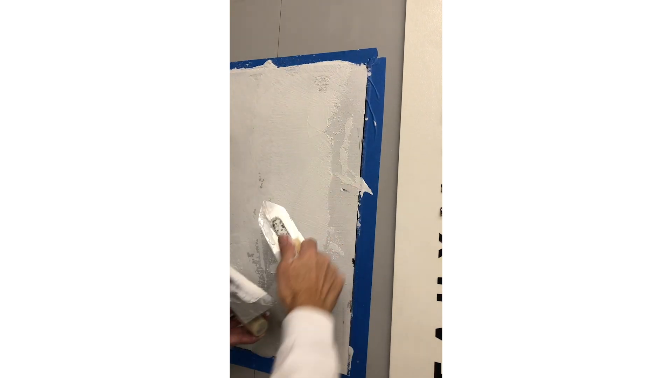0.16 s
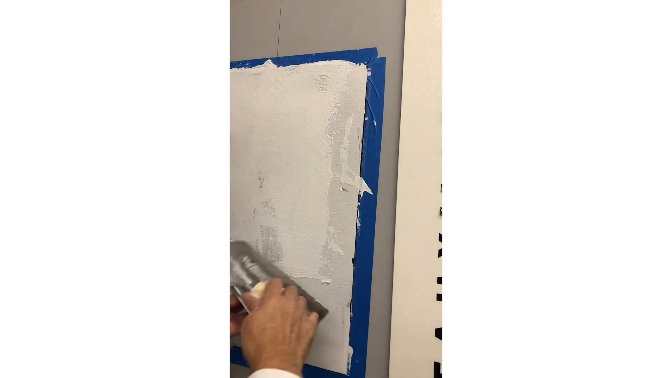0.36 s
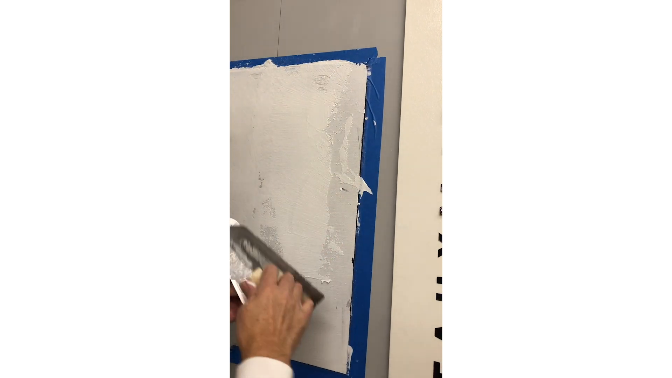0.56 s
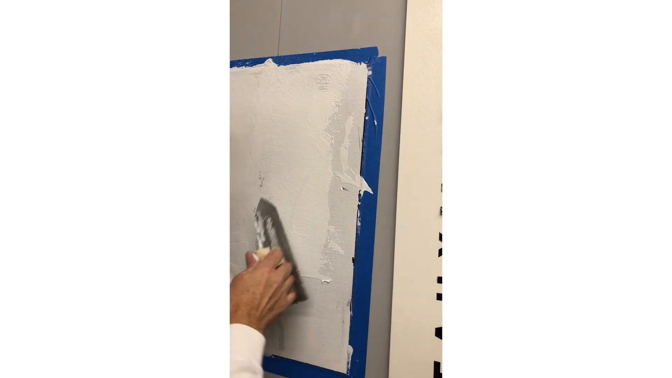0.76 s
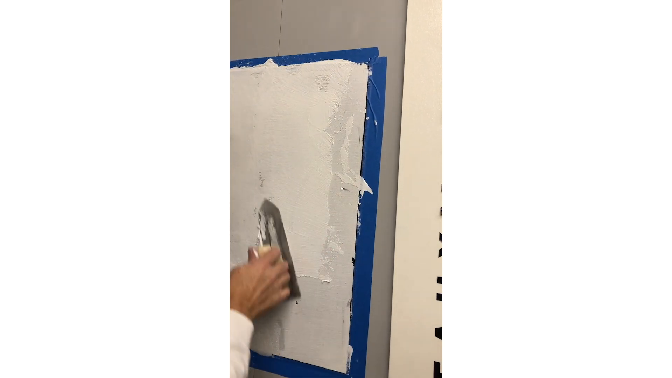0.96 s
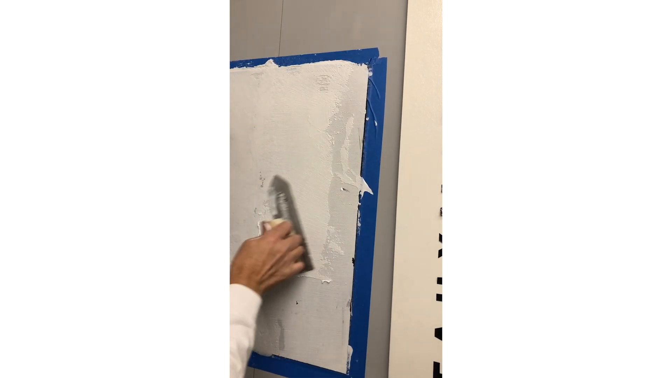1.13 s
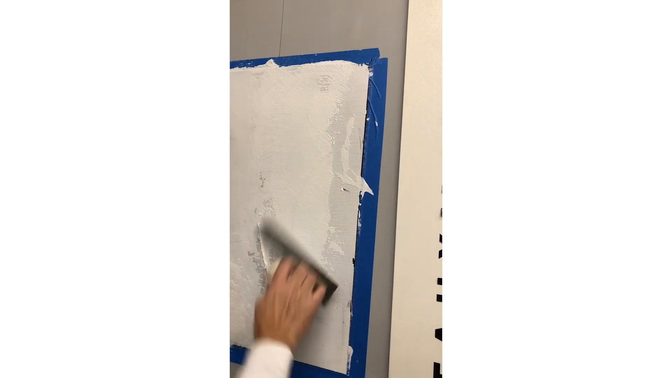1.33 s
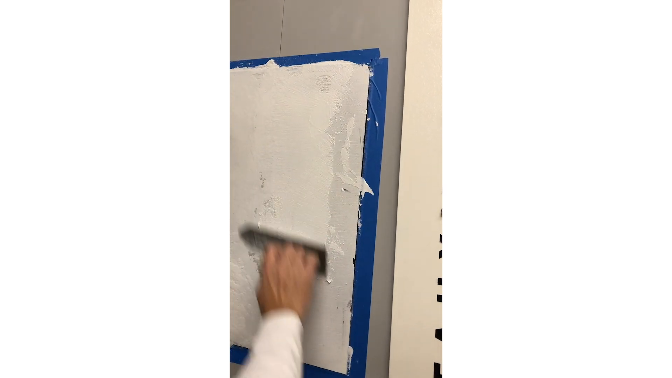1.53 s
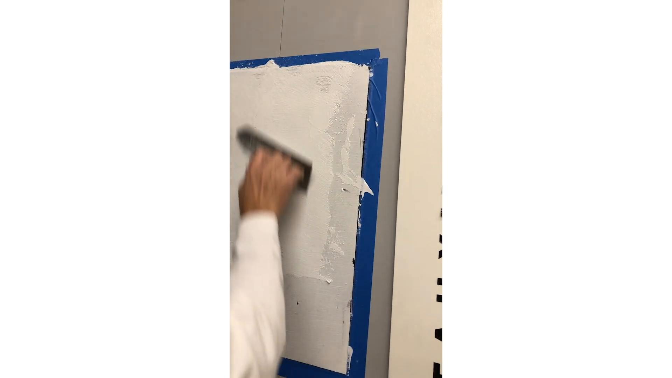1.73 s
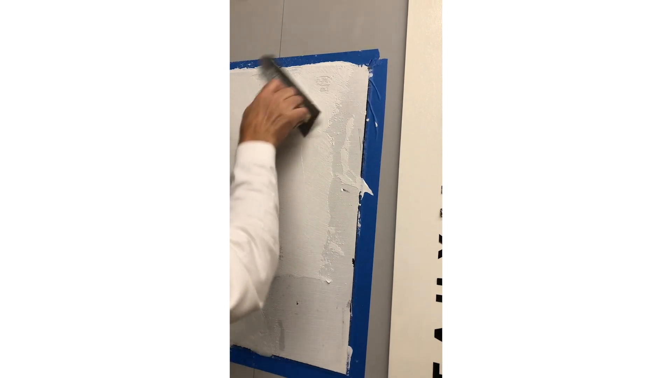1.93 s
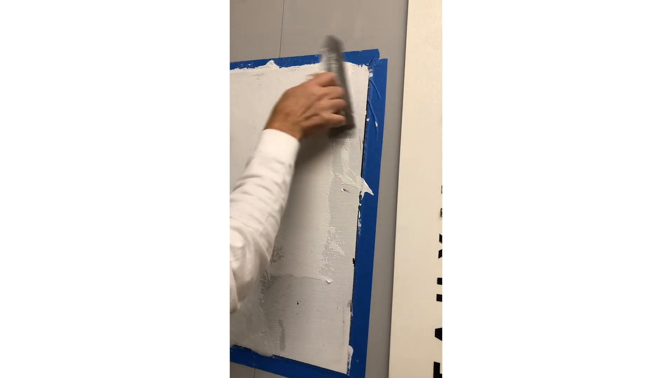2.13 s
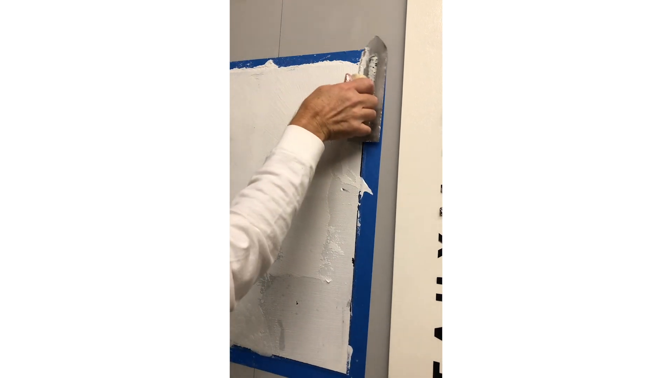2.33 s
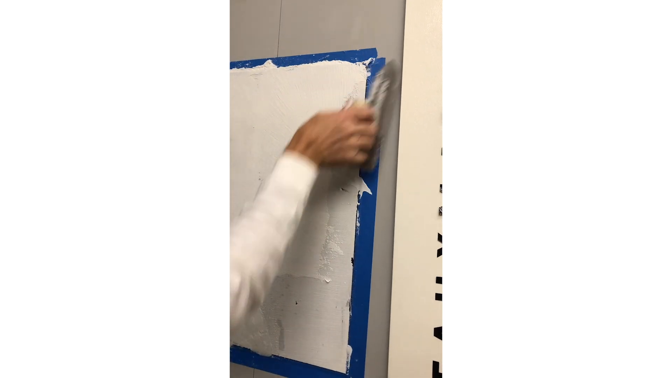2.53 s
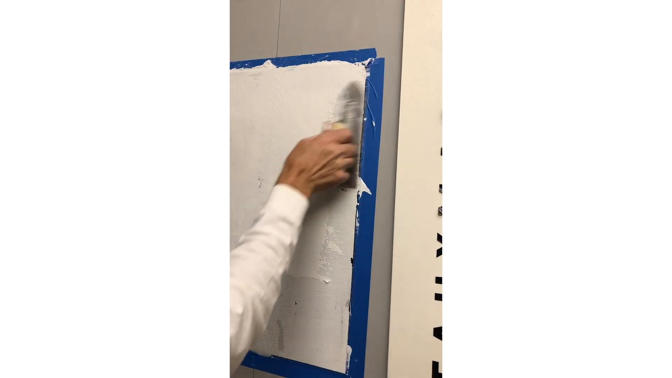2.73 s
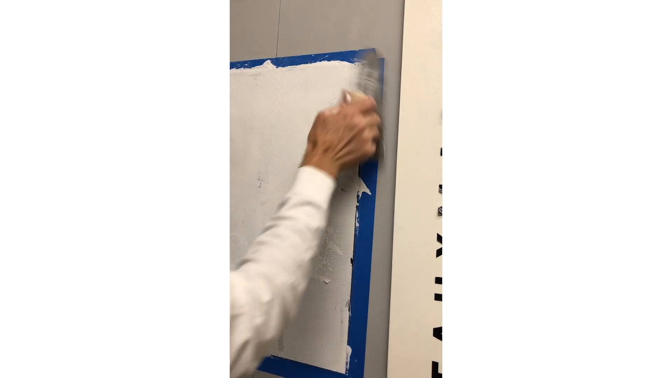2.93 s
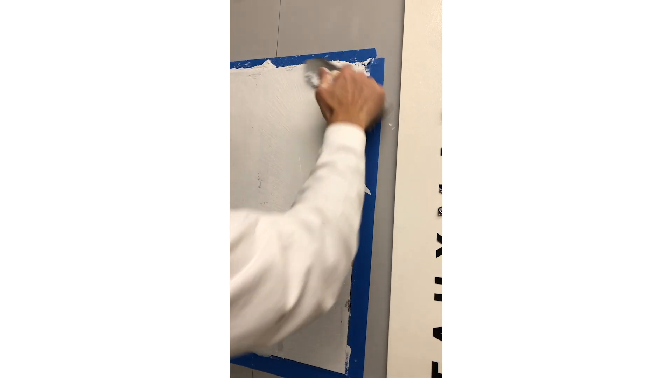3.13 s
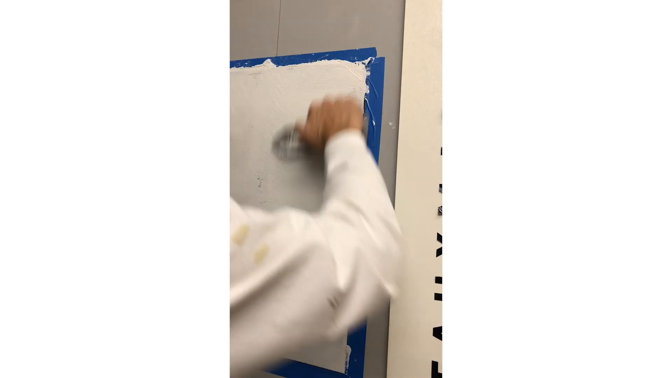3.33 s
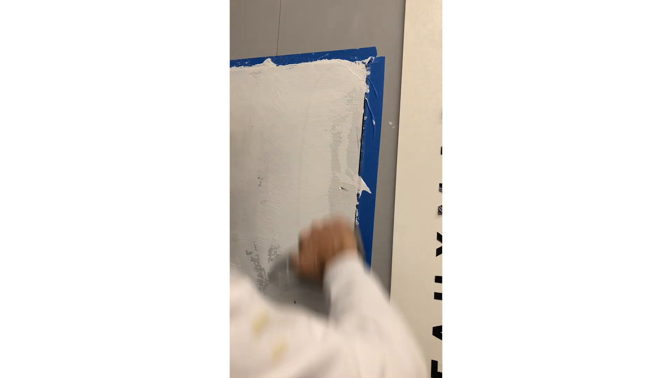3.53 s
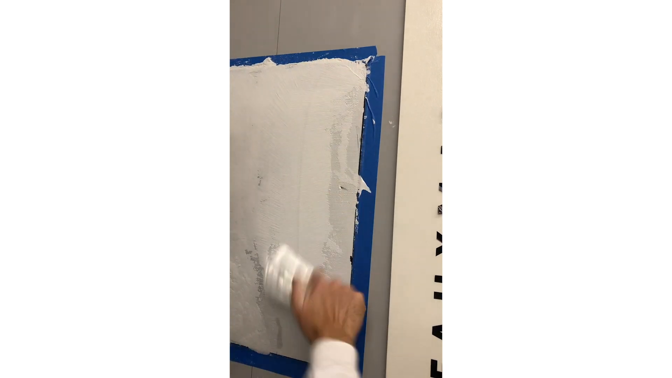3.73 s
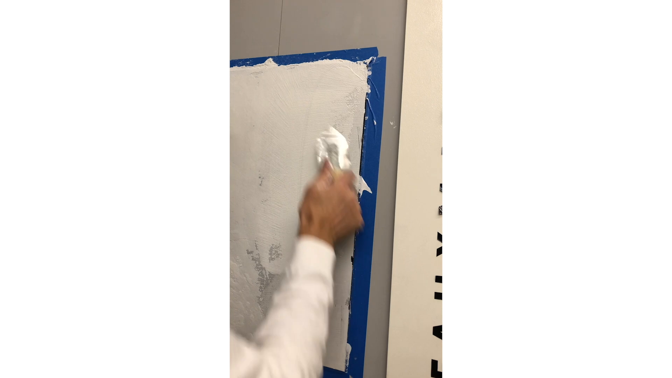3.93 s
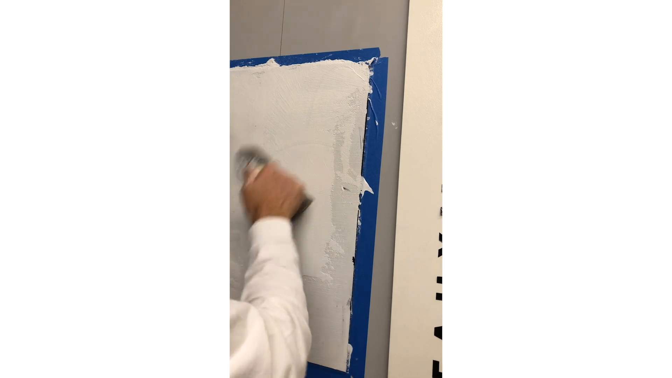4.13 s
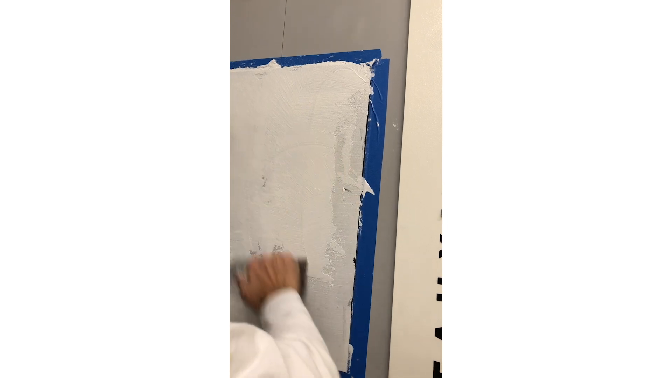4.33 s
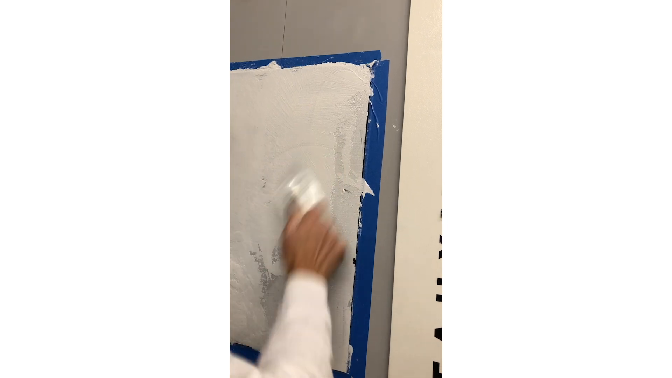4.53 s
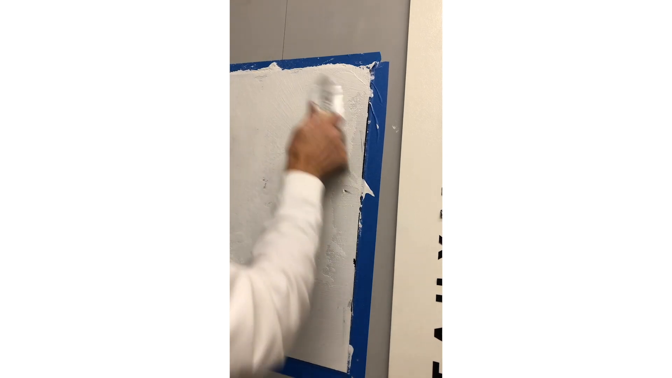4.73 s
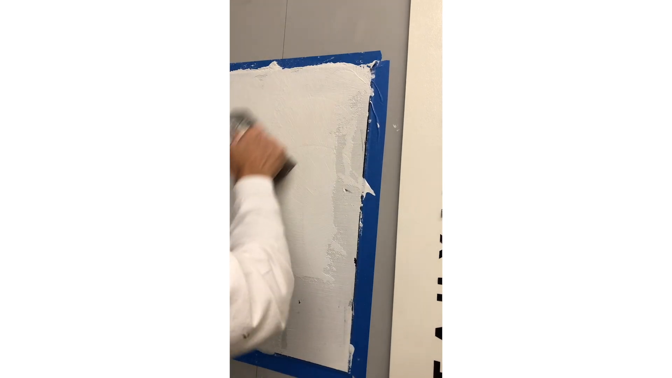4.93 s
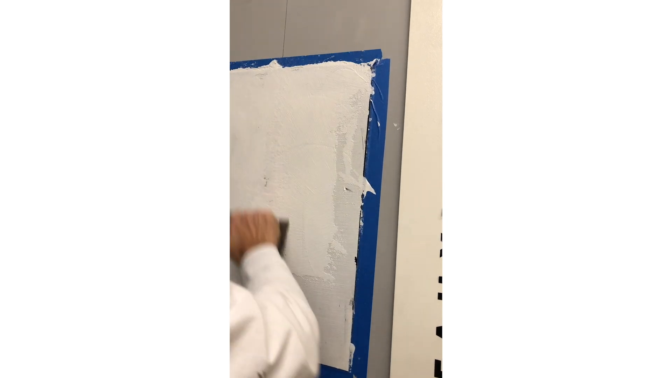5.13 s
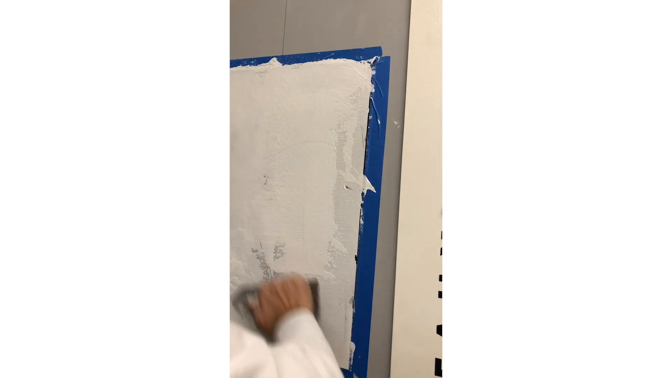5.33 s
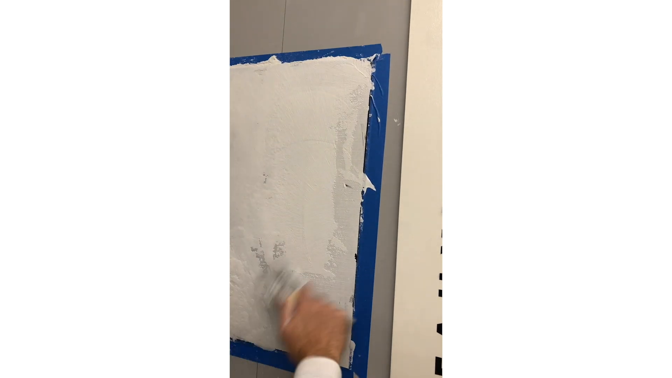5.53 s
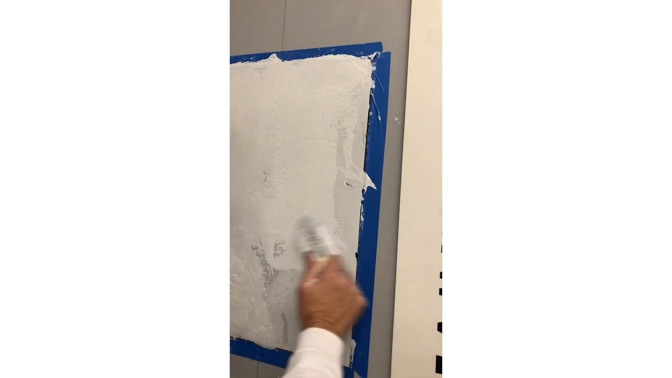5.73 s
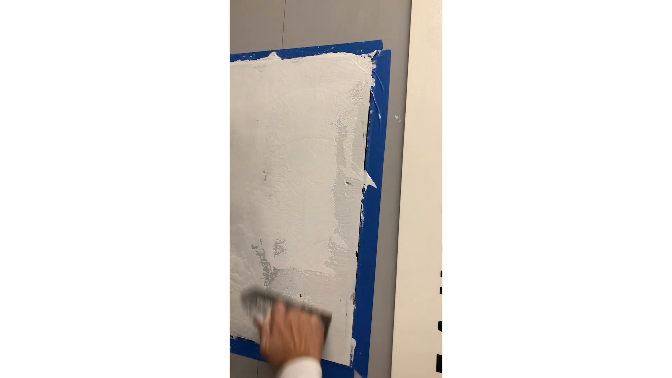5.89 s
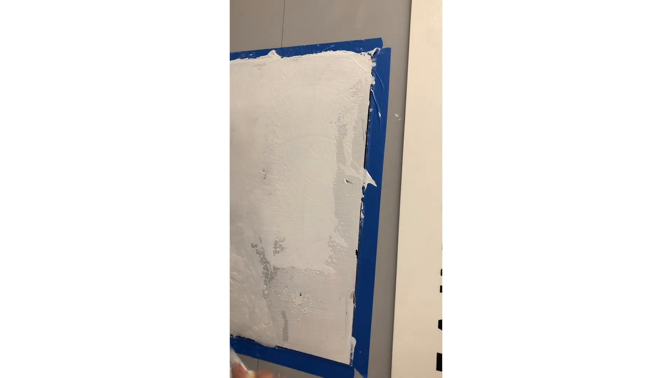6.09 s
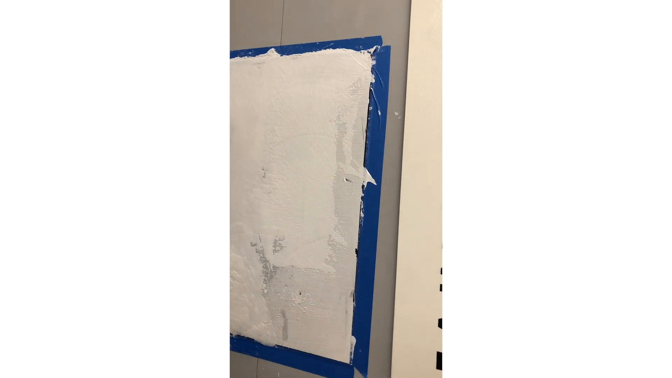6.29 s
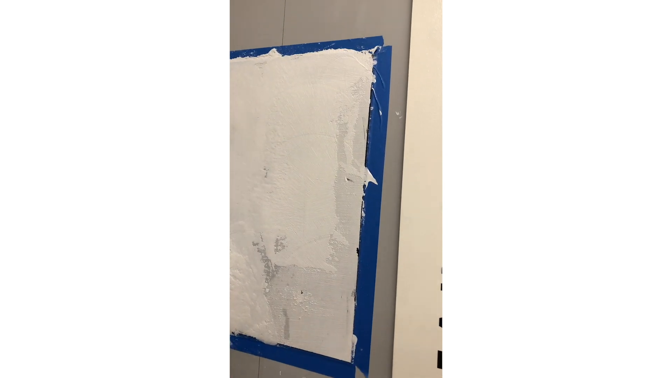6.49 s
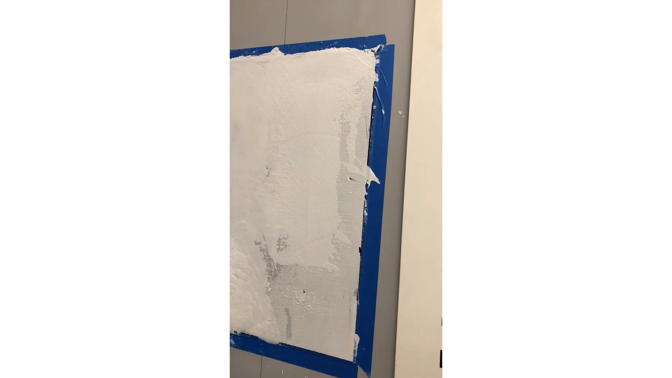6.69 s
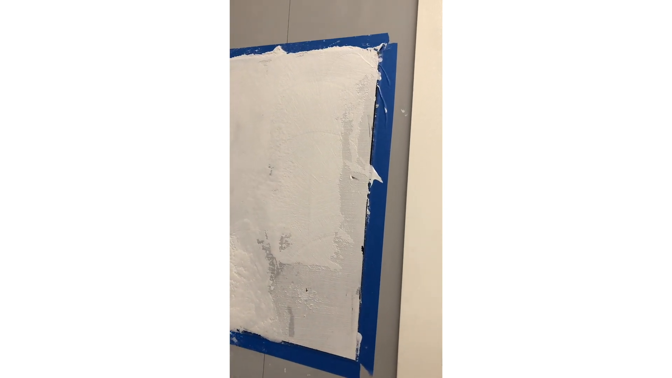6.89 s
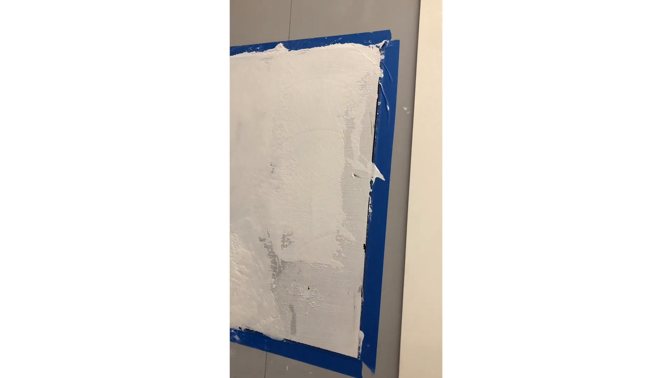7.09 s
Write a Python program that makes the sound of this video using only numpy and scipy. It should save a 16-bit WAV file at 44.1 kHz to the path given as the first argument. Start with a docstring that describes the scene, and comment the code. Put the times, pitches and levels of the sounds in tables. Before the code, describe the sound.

A plasterer's metal blade scrapes a wall-mounted board: a short rasp, light touches, a long rough stroke, then several more swipes, some long and some brief. The edge judders, ticks and squeaks, with a faint low drone from the board. A close microphone catches a short indoor tail over quiet air hum. Finally comes a pause, faint taps and a soft scrape.

```python
"""In a small room, a steel trowel spreads wet plaster over a board on the wall in quick strokes.
The edge sticks and slips: pulsed clicks through blade resonances rasp, finer grains hiss,
and noise through low resonances makes the board drone. Single modes squeal, coarse grains tick.
Decaying noise bursts tap, sine modes thud; after a pause come light knocks and soft scrapes.
Noise and low tones make the ventilation hum; a diffuse tail follows the trowel."""
import sys
import numpy as np
from scipy import signal
from scipy.fft import rfft, irfft, next_fast_len
from scipy.io import wavfile
from scipy.ndimage import uniform_filter1d, map_coordinates

SR = 44100
rng = np.random.default_rng(int(sys.argv[2]) if len(sys.argv) > 2 else 0)


def digitize_waveform(pressure):
    """Quantize a signal to 16-bit integers and store it at the path in sys.argv[1].

    Rows of a 2-D input are taken as channels; values are limited to [-1, 1].
    """
    field = np.atleast_2d(pressure).T
    bounded = np.clip(field, -1, 1)
    quanta = np.round(bounded * 32767).astype(np.int16)
    wavfile.write(sys.argv[1], SR, quanta)


N = 315315
TIME = np.arange(N) / SR   # [s]

# the blade's light glides; levels are before the mix trims: (landing [s], lift-off [s], rasp [dB],
# hiss [dB], board [dB], fine-grit brightness [dB], rasp centre at landing [Hz], at lift-off [Hz])
GLIDES = [(0.0, 0.054, -33.5, -38.5, -49.5, 3, 2100, 2130),
          (0.471, 0.642, -42.5, -44.0, -58, 1, 2260, 2500), (0.923, 1.21, -49, -42, -64.5, 12, 2000, 2020),
          (1.437, 2.307, -40, -37.5, -56.5, -2.0, 1810, 2200),
          (2.316, 2.464, -50.5, -46.5, -71.5, 10, 2480, 2070),
          (2.641, 2.815, -53, -44, -72, 13.5, 2740, 2660),
          (3.053, 3.663, -43.5, -44.5, -65, 9.5, 3200, 2610), (3.94, 4.405, -35, -39, -56.5, 7, 2630, 2130),
          (4.693, 5.434, -40, -42.5, -64, 9, 2630, 2200),
          (5.688, 5.982, -37.5, -35.0, -57.5, 1.5, 2460, 2870)]
# the hand bears down and the edge bites; levels are before the mix trims:
# (time [s], rise [s], fall [s], rasp level [dB], hiss level [dB], rasp centre [Hz])
EDGE_BITES = [(0.013, 0.079, 0.039, -23.5, -32.5, 2170), (0.928, 0.01, 0.031, -45, -40, 1700.0),
              (1.18, 0.032, 0.018, -38.5, -31, 1760), (1.2, 0.017, 0.02, -24.5, -37.5, 1620),
              (1.494, 0.029, 0.051, -18.5, -31, 1800), (1.548, 0.054, 0.105, -20.0, -36.5, 1540),
              (1.679, 0.053, 0.134, -27.5, -33.5, 1460), (2.025, 0.056, 0.04, -38, -40, 2650),
              (2.28, 0.13, 0.031, -36.5, -39, 1840), (2.413, 0.032, 0.073, -28.5, -35.5, 1970),
              (2.736, 0.026, 0.057, -32.5, -30, 2280), (2.801, 0.022, 0.022, -28.5, -37, 2780),
              (3.062, 0.011, 0.036, -40.5, -71, 2470), (3.298, 0.07, 0.062, -27.5, -33.5, 2620.0),
              (3.468, 0.18, 0.187, -26.5, -27.5, 2020), (3.649, 0.11, 0.033, -25.5, -36.0, 1990.0),
              (3.951, 0.022, 0.069, -26.5, -49.5, 2070), (4.037, 0.051, 0.088, -22.5, -36, 2020),
              (4.366, 0.03, 0.035, -30.0, -43.5, 2000), (4.731, 0.028, 0.089, -26.5, -35.5, 2030),
              (4.834, 0.065, 0.074, -22.5, -35, 2110), (5.154, 0.021, 0.022, -37, -38.5, 2540),
              (5.294, 0.057, 0.179, -37.5, -40.5, 2150.0), (5.418, 0.024, 0.03, -26, -32, 2060),
              (5.741, 0.028, 0.047, -22.5, -40, 2180), (5.804, 0.056, 0.035, -20, -39, 2160),
              (5.886, 0.017, 0.026, -45.5, -32.0, 2650.0), (5.976, 0.029, 0.013, -20, -24.5, 2210)]
BOARD_WITH_RASP, BOARD_WITH_HISS = 0.23, 0.49   # dB of board drone per dB that bites add to each
BITE_DULLS = 0.51   # dB of brightness lost per dB that bites add to the hiss
STROKE_BRIGHTENS_DB = 1   # from landing to lift-off, as the plaster under the blade thins


def hand(landing_s, lifting_s):
    """Sets gains, rasp centre and brightness: strokes glide steadily, and bites add their power."""
    lands, lifts, *settings = np.transpose(GLIDES)
    now = np.maximum(np.searchsorted(lands, TIME, side="right") - 1, 0)   # the latest stroke
    rasp_db, hiss_db, board_db, bright_db, first_hz, last_hz = np.array(settings)[:, now]
    landing = np.clip((TIME - lands[now]) / landing_s, 0, 1)
    lifting = np.clip(1 - (TIME - lifts[now]) / lifting_s, 0, 1)
    contact = landing * lifting
    progress = np.clip((TIME - lands[now]) / (lifts - lands)[now], 0, 1)
    rasp_power = from_db(rasp_db) ** 2
    hiss_power = from_db(hiss_db) ** 2
    centre_hz = first_hz + (last_hz - first_hz) * progress
    for s, rise_s, fall_s, bite_rasp_db, bite_hiss_db, bite_hz in EDGE_BITES:
        pressure = bite(s, rise_s, fall_s)
        added = (from_db(bite_rasp_db) * pressure) ** 2
        rasp_power = rasp_power + added
        hiss_power = hiss_power + (from_db(bite_hiss_db) * pressure) ** 2
        # a bite pulls the rasp towards its own pitch
        centre_hz = centre_hz + (bite_hz - centre_hz) * added / rasp_power
    rasp_rise_db = 10 * np.log10(rasp_power) - rasp_db
    hiss_rise_db = 10 * np.log10(hiss_power) - hiss_db
    board_db = board_db + BOARD_WITH_RASP * rasp_rise_db + BOARD_WITH_HISS * hiss_rise_db
    bright_db = bright_db - BITE_DULLS * hiss_rise_db + STROKE_BRIGHTENS_DB * (progress - .5)
    rasp = contact * np.sqrt(rasp_power)
    hiss = contact * np.sqrt(hiss_power)
    board = contact * from_db(board_db)
    return rasp, hiss, board, centre_hz, bright_db


BITE_SHAPE = 1.57   # how a bite swells and eases: 1 is exponential, 2 a bell


def bite(s, rise_s, fall_s):
    """Pressure builds to 1 and eases off again."""
    span_s = np.where(TIME < s, rise_s, fall_s)
    return np.exp(-(np.abs(TIME - s) / span_s) ** BITE_SHAPE)


def slips(per_s, jitter, release, stuck):
    """The edge catches and lets go at an uneven rate; each slip starts hard and fades."""
    cycle = np.cumsum(per_s * np.exp(jitter * drift(60))) / SR
    strength = from_db(2.8 * drift(38))
    return rms_one(strength * (stuck + np.exp(-(cycle % 1) / release)))


# colour of the force on the blade: (frequency [Hz], relative level per Hz [dB])
BLADE_COLOUR = [(250, -43), (600, -13), (900, -10), (1300, -1.5), (1600, -3), (2100, -6.5), (2700, -3),
                (3400, -6.5), (4300, -9.5), (7000, -16)]
# bending modes of the steel blade: (frequency [Hz], width [Hz], lift [dB])
BENDING_MODES = [(958, 270, 4), (1230, 87, -1), (1470, 16, -0.5), (1631, 26, 4), (1910, 18, 4.5),
                 (2088, 26, 2.5), (2395, 22, 3), (2470, 26, -3), (2920, 25, 4.5), (3430, 75, 2)]


def blade_rasp(judder, centre_hz, core_db, core_wander, edge_hz, flutter_db):
    """Slips shake the damped blade; its tilt moves a broad resonance with a narrow core."""
    force = coloured(judder * grains(per_s=7000, spread_db=1.5), BLADE_COLOUR)
    force = lifted(force, BENDING_MODES)
    # wet plaster damps the higher bending modes
    damping = signal.butter(4, edge_hz, fs=SR, output="sos")
    force = signal.sosfilt(damping, force)
    broad = moving_resonance(force, centre_hz, width_hz=1300)
    core_hz = centre_hz * np.exp(core_wander * drift(14))
    core = moving_resonance(broad, core_hz, width_hz=176)
    lumps = from_db(flutter_db * drift(25))   # the edge rides over lumps and hollows
    return lumps * evened(broad + from_db(core_db) * core, size=700)


# colour of the shearing grit: (frequency [Hz], relative level per Hz [dB])
GRIT_COLOUR = [(300, -16), (900, -1.5), (2000, 0.5), (3000, 3.5), (4500, 5), (6500, 3), (8500, 2),
               (10500, -0.5), (13000, -5.5), (16000, -12)]
# high blade modes that colour the hiss: (frequency [Hz], width [Hz], lift [dB])
HIGH_MODES = [(6300, 22, -3), (7700, 20, -1.5), (11600, 82, 3)]


def grit_hiss(judder, judder_share, bright_db, fine_hz):
    """Countless grains shear in pulses under the edge; a steeper blade brings out the finest."""
    shear = grains(per_s=16000, spread_db=7.0) * (1 + judder_share * judder)
    hiss = lifted(coloured(shear, GRIT_COLOUR), HIGH_MODES)
    highpass = signal.butter(1, fine_hz, "high", fs=SR, output="sos")
    fine = signal.sosfilt(highpass, hiss)
    return evened(hiss + (from_db(bright_db) - 1) * fine, size=700)


# low resonances of the board: (frequency [Hz], width [Hz], relative level [dB])
BOARD_MODES = [(302, 170, -15), (426, 32, 8.5), (485.5, 50, -1.5), (591, 160, -3), (782.5, 6.7, 1)]


def board_drone(judder):
    """The drag of the blade sets the board's low resonances going."""
    force = judder * rng.standard_normal(N)
    drone = sum(from_db(db) * signal.lfilter(*resonance(hz, width_hz), force)
                for hz, width_hz, db in BOARD_MODES)
    return evened(drone, size=3000)


# the coarsest grains snag on the edge; level before the mix trim: (time [s], level [dB])
BIG_SNAGS = [(2.2245, -18), (2.2462, -18), (2.2985, -16), (2.405, -16), (2.4461, -18), (4.9982, -15.5),
             (5.406, -14)]


def catches(rasp, per_s, spread_db, small_db, ring_hz, ring_width_hz, crack_db):
    """Coarse grains tick on the blade: a few big snags, and small random ones as it rasps."""
    clicks = from_db(small_db) * rasp * grains(per_s, spread_db)
    for s, db in BIG_SNAGS:
        clicks[int(s * SR)] += from_db(db)
    b, a = resonance(ring_hz, ring_width_hz)
    ring = signal.lfilter(b / (2 * b[0]), a, clicks)   # the ring starts at half the click's height
    return ring + from_db(crack_db) * clicks


# the edge grabs and one mode of blade or board sings out; level is of the direct sound:
# (centre time [s], half-length [s], frequency [Hz], level [dB])
GRABS = [(0.539, 0.0079, 1290, -36), (0.592, 0.02, 884, -48), (0.647, 0.0096, 3410, -35.5),
         (0.955, .05, 1650, -44), (1.033, 0.0078, 3600, -36.5), (1.07, .07, 1650, -45.5),
         (1.205, 0.0089, 1068, -30.5), (1.555, 0.04, 1460, -25), (2.22, 0.1, 423, -50.5),
         (2.246, 0.095, 2050, -36), (2.44, 0.045, 1580, -32.5), (2.81, 0.017, 2440, -29),
         (2.836, 0.027, 427, -50), (3.305, 0.059, 406, -42.5), (3.437, 0.2, 1876, -27.5),
         (3.691, 0.035, 476, -48), (3.986, 0.018, 2100, -23), (5.952, 0.017, 1706, -25.5)]


def squeals(judder, relative_width):
    """Rough, short notes: friction feeds a single mode."""
    force = judder * rng.standard_normal(N)
    notes = np.zeros(N)
    for s, length_s, hz, db in GRABS:
        note = signal.lfilter(*resonance(hz, relative_width * hz), force)
        notes += from_db(db) * swell(s, length_s) * evened(note, size=900)
    return notes


# the blade touches down or knocks; level is before the ring and click gains:
# (time [s], level [dB], ring centre [Hz])
LANDINGS = [(0.458, -27.5, 2310), (0.475, -21, 2670), (0.905, -29, 2290), (0.92, -26, 1570),
            (1.031, -24, 3450), (1.428, -21, 1900), (1.458, -16, 2000), (2.643, -18.5, 2400),
            (3.053, -36, 2600), (3.944, -16, 2020), (4.698, -17.5, 2140), (5.688, -45, 1840),
            (6.741, -37.5, 1990), (6.777, -43.5, 1030), (6.94, -38, 1200)]
# colour of the crack: (frequency [Hz], relative level per Hz [dB])
CRACK_COLOUR = [(100, -21), (400, -3.5), (1200, 5), (2500, 2.5), (5000, -1), (10000, -2.5), (16000, -21.5)]


def taps(t60, ring_db, click_db):
    """Steel meets plaster: a short crack and a damped ring of the blade."""
    out = np.zeros(N)
    crack = rms_one(coloured(rng.standard_normal(N), CRACK_COLOUR))
    for s, db, hz in LANDINGS:
        hit = from_db(db) * dying(s, t60) * crack
        ring = signal.lfilter(*resonance(hz, 520), hit)
        out += from_db(click_db) * hit + from_db(ring_db) * ring
    return out


# the board bumps against the wall: (time [s], level before the mode levels [dB])
BOARD_BUMPS = [(2.655, -45.5), (3.952, -51)]
# modes of the thud: (frequency [Hz], relative level [dB], time to fall 60 dB [s])
THUD_MODES = [(117, -0.5, 0.37), (153, -6, 0.26), (261, -7, 0.087), (420, 3, 0.076), (572, 1.5, .07)]


def bumps():
    """A firm landing knocks the whole board, whose modes thud as decaying sines."""
    return sum(from_db(db + mode_db) * dying(s, t60) * np.sin(2 * np.pi * hz * (TIME - s))
               for s, db in BOARD_BUMPS for hz, mode_db, t60 in THUD_MODES)


# soft scrapes away from the board: (centre time [s], half-length [s], level [dB])
SOFT_WIPES = [(6.377, 0.029, -60.5), (6.937, 0.034, -51.5), (7.014, 0.017, -47.5), (7.047, 0.042, -42.5)]
# colour of the loose plaster: (frequency [Hz], relative level per Hz [dB])
WIPE_COLOUR = [(200, -5.5), (600, -10), (950, -0.5), (1700, 1.5), (2600, -7.5), (5000, -5.5), (9000, -13.5),
               (16000, -22)]


def soft_scrapes():
    """Brief, dull wipes of the blade through loose plaster."""
    gain = sum(from_db(db) * swell(s, length_s) for s, length_s, db in SOFT_WIPES)
    wipe = coloured(grains(per_s=3800, spread_db=-0.5), WIPE_COLOUR)
    return gain * evened(wipe)


# echoes from board and wall: (mean delay [ms], wander of the delay [ms], strength [ratio])
BOARD_ECHOES = [(1.3, 0.21, .22), (3.401, .3, 0.29), (6.199, 0.33, .16)]


def near_echoes(x, wander_per_s):
    """Short, wandering echoes comb the scrape into shifting peaks; the gain allows for their power."""
    out, power = x, 1
    for delay_ms, wander_ms, strength in BOARD_ECHOES:
        delay_s = (delay_ms + wander_ms * drift(wander_per_s)) / 1000
        out = out + strength * map_coordinates(x, [(TIME - delay_s) * SR], order=2)
        power += strength ** 2
    return out / np.sqrt(power)


# decay of the room: (frequency [Hz], time to fall 60 dB [s])
ROOM_DECAY = [(150, 0.84), (600, 0.58), (2000, 0.27), (5000, 0.43), (10000, 0.071), (16000, 0.4)]


def room(x, first_echo_s):
    """A diffuse tail of noise bands about an octave wide, each dying at its own rate."""
    t, response = TIME[:SR], np.zeros(SR)
    edges = np.geomspace(70, 17000, 9)   # [Hz]
    for low, high in zip(edges, edges[1:]):
        bandpass = signal.butter(2, [low, high], "band", fs=SR, output="sos")
        band = signal.sosfilt(bandpass, rng.standard_normal(SR))
        t60 = at_hz(ROOM_DECAY, np.sqrt(low * high))
        response += band * np.exp(-np.log(1000) * t / t60) * (t > first_echo_s)
    return signal.fftconvolve(x, response / np.linalg.norm(response))[:N]


# wavering tones of the ventilation: (frequency [Hz], mean rms level [dB])
HUM_TONES = [(66, -77), (89, -72), (119.5, -67.5)]
# colour of the room's air noise: (frequency [Hz], relative level per Hz [dB])
AIR_COLOUR = [(18, -34), (30, -20), (42, -3), (70, -2), (110, -1), (160, -6), (250, -9), (400, -14),
              (700, -18), (1300, -20), (3000, -24), (7000, -27), (11000, -31), (16000, -37)]
AIR_DB = -64   # rms


def ventilation():
    """Steady air noise with a few low tones that waver in level and phase."""
    hum = np.zeros(N)
    for hz, db in HUM_TONES:
        level = from_db(db + 2.0 * drift(4))
        phase = 2 * np.pi * hz * TIME + 0.75 * drift(2.7)
        hum += level * np.sqrt(2) * np.sin(phase)
    air = rms_one(coloured(rng.standard_normal(N), AIR_COLOUR))
    return hum + from_db(AIR_DB) * air


def from_db(db):
    """Turns decibels into an amplitude ratio."""
    return 10 ** (np.asarray(db) / 20)


def rms_one(x):
    """Scales a signal to rms 1."""
    return x / np.sqrt(np.mean(x ** 2) + 1e-20)


def evened(x, size=1500):
    """Holds the running level at 1 and leaves the fast grain alone; size in samples."""
    return x / np.sqrt(np.abs(uniform_filter1d(x ** 2, size)) + 1e-12)


def at_hz(points, hz):
    """Reads a table on a log-frequency axis."""
    known_hz, values = np.transpose(points)
    return np.interp(np.log(hz + 1e-9), np.log(known_hz), values)


def coloured(x, spectrum):
    """Causal (minimum-phase) filter with the given spectrum."""
    size = 2 * next_fast_len(N // 2 + SR // 4)
    hz = np.arange(size // 2 + 1) * SR / size
    cepstrum = irfft(np.log(from_db(at_hz(spectrum, hz))))
    # folding the cepstrum forward in time makes the phase minimal
    cepstrum[1:size // 2] *= 2
    cepstrum[size // 2 + 1:] = 0
    return irfft(rfft(x, size) * np.exp(rfft(cepstrum)))[:N]


def drift(rate):
    """Slow chance with spread 1, drawn at every 20th sample."""
    r = np.exp(-2 * np.pi * rate * 20 / SR)
    noise = rng.standard_normal((N + SR) // 20)
    slow = signal.lfilter([1], [1, -2 * r, r * r], noise)[SR // 20:]   # drop the filter's start
    return np.interp(np.arange(N) / 20, np.arange(len(slow)), rms_one(slow))


def resonance(hz, width_hz):
    """Coefficients of a resonance with gain about 1 on top."""
    r = np.exp(-np.pi * width_hz / SR)
    b = (1 - r * r) / 2 * np.array([1, 0, -1])
    a = [1, -2 * r * np.cos(2 * np.pi * hz / SR), r * r]
    return b, a


def moving_resonance(x, hz, width_hz, size=128):
    """A resonance whose centre follows a curve, block by block."""
    out, state = np.zeros(N), np.zeros(2)
    for i in range(0, N, size):
        b, a = resonance(hz[i], width_hz)
        out[i:i + size], state = signal.lfilter(b, a, x[i:i + size], zi=state)
    return out


def lifted(x, modes):
    """Each mode raises or lowers a narrow band, which rings on briefly."""
    for hz, width_hz, lift_db in modes:
        x = x + (from_db(lift_db) - 1) * signal.lfilter(*resonance(hz, width_hz), x)
    return x


def grains(per_s, spread_db):
    """Random clicks of uneven size and sign; rms 1."""
    sizes = from_db(spread_db * np.clip(rng.standard_normal(N), -2, 2))
    signs = rng.choice([-1, 1], N)
    return rms_one(sizes * signs * (rng.random(N) < per_s / SR))


def dying(start, t60):
    """An envelope that jumps to 1 and dies away."""
    return (TIME >= start) * np.exp(-np.log(1000) * np.clip((TIME - start) / t60, 0, 2))


def swell(s, length):
    """A smooth rise and fall around one moment."""
    return np.exp(-2 * ((TIME - s) / length) ** 2)


def scene():
    """Trowel and board, close by in a small room."""
    rasp, hiss, board, centre_hz, bright_db = hand(landing_s=0.0008, lifting_s=0.021)
    judder = slips(per_s=140, jitter=.5, release=0.4, stuck=0.73)
    blade = blade_rasp(judder, centre_hz, core_db=3.5, core_wander=0.092, edge_hz=4100, flutter_db=1.0)
    grit = grit_hiss(judder, judder_share=0.89, bright_db=bright_db, fine_hz=9050)
    scrape = from_db(0.5) * rasp * blade
    scrape += from_db(0.86) * hiss * grit
    scrape += from_db(3.0) * board * board_drone(judder)
    scrape += catches(rasp, per_s=40, spread_db=3.5, small_db=-20,
                      ring_hz=2200, ring_width_hz=600, crack_db=-4.5)
    notes = squeals(judder, relative_width=0.021)
    handling = taps(t60=0.04, ring_db=-6, click_db=-15.5) + bumps() + soft_scrapes()
    direct = near_echoes(scrape, wander_per_s=1.223) + notes + handling
    # the room gathers the blade's sound from all sides, so its feed is free of the near echoes
    tail = room(scrape + from_db(-8.5) * notes + handling, first_echo_s=.003)
    mono = direct + from_db(-12.5) * tail + ventilation()
    return np.array([mono, mono])


def record(dry):
    """One microphone on both channels; the top is cut steeply at 15.9 kHz."""
    lowpass = signal.ellip(12, .1, 80, 15900, fs=SR, output="sos")
    return signal.sosfilt(lowpass, dry)


dry = scene()
out = record(dry)
digitize_waveform(out)
```